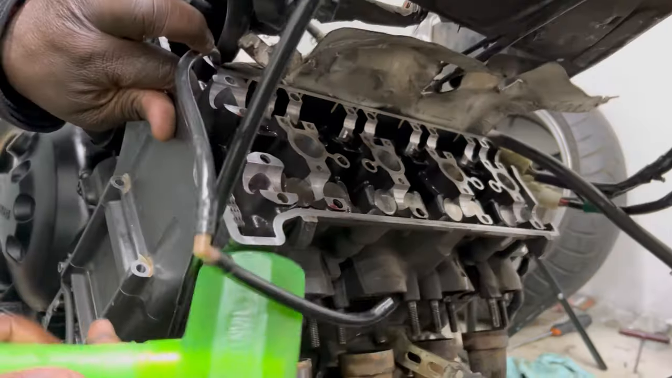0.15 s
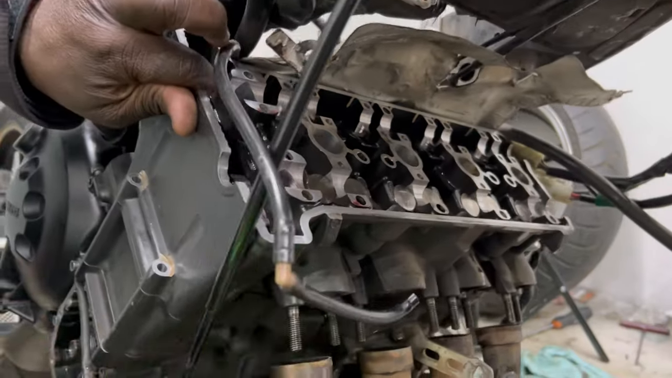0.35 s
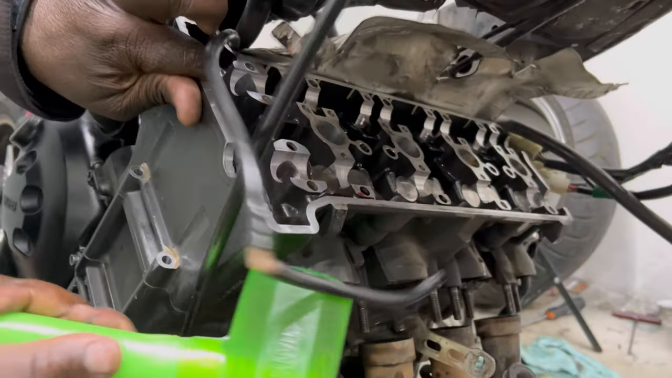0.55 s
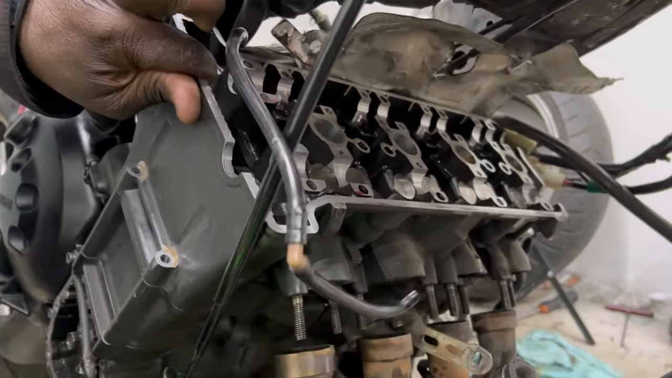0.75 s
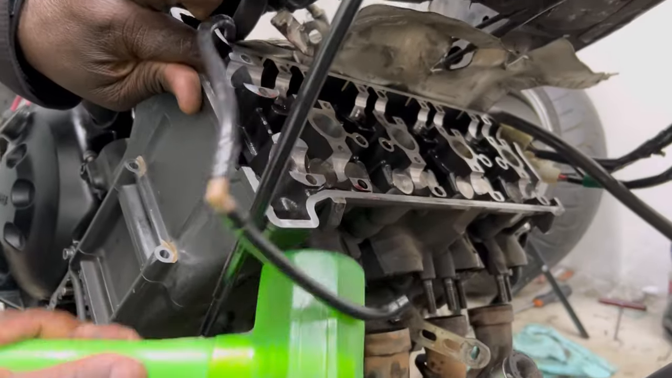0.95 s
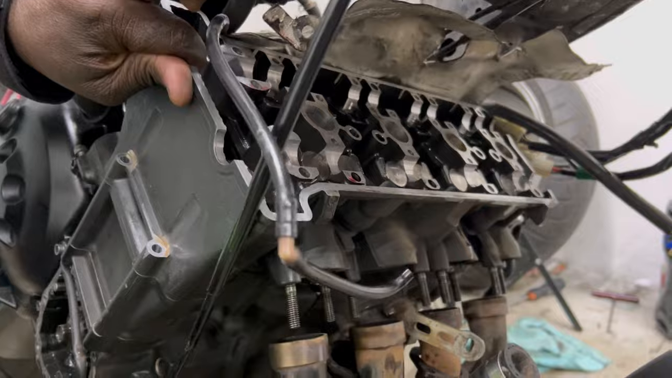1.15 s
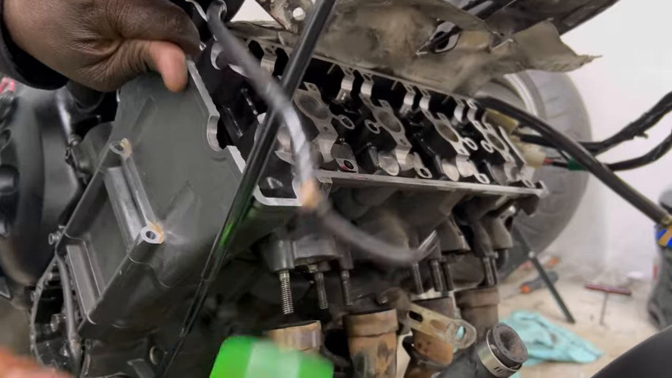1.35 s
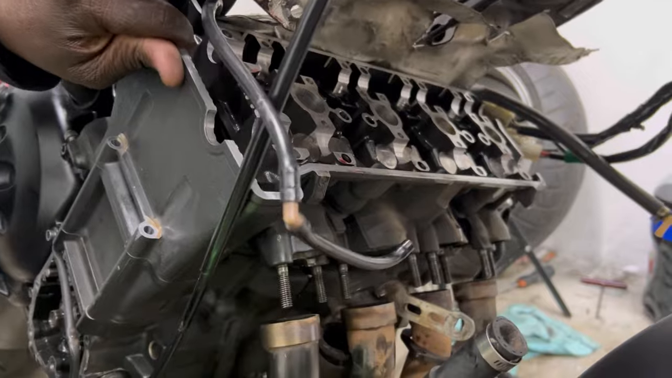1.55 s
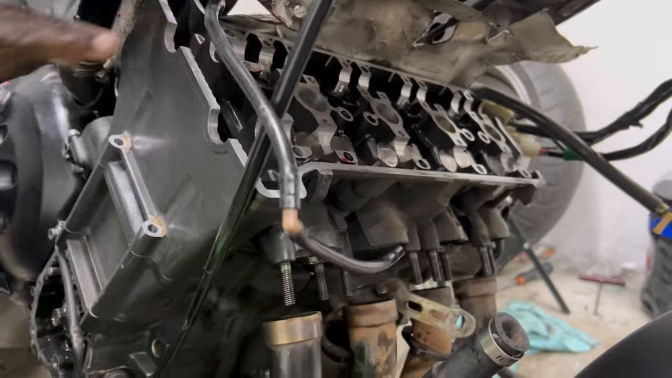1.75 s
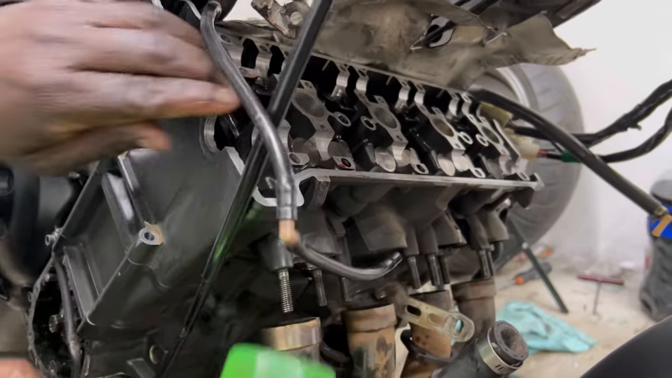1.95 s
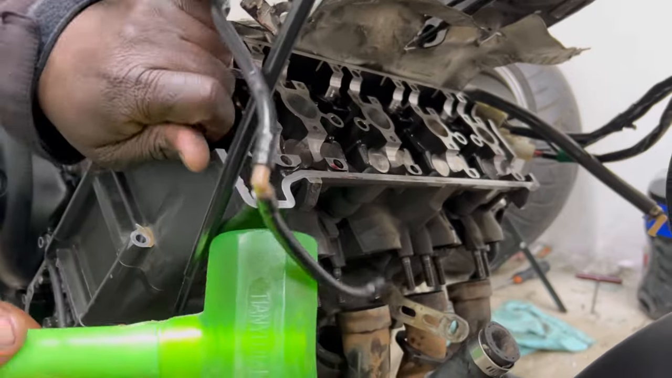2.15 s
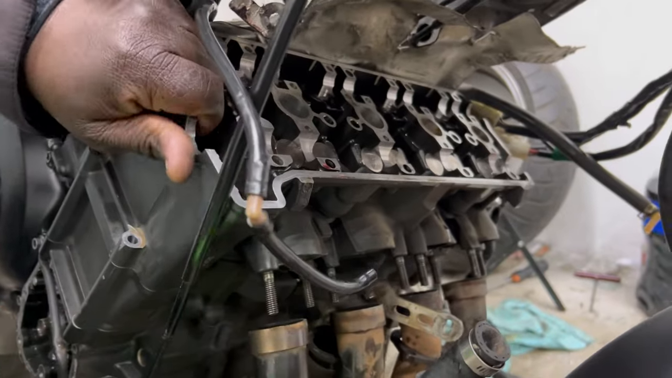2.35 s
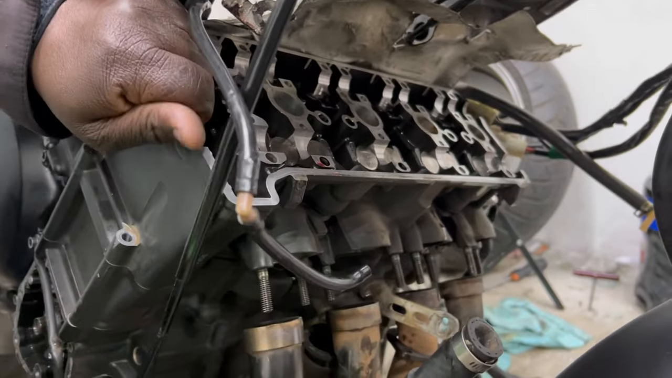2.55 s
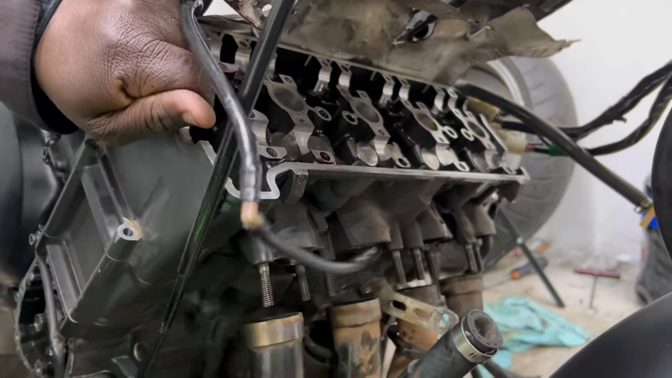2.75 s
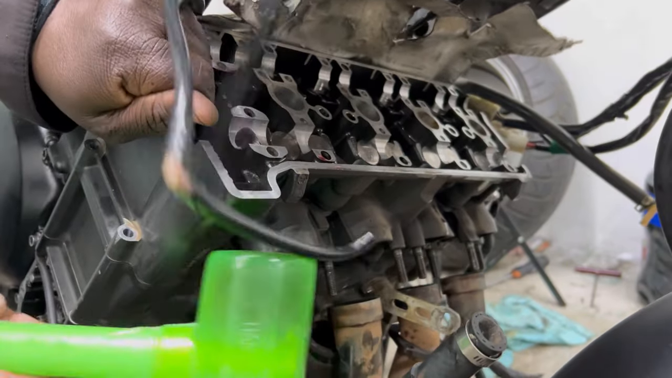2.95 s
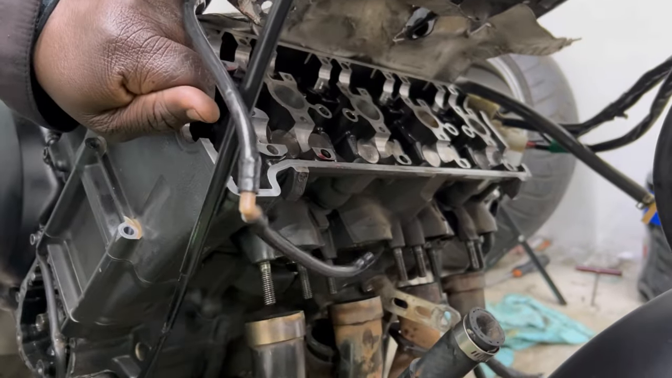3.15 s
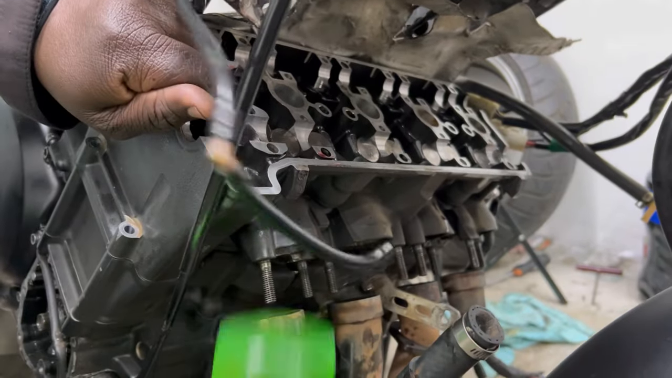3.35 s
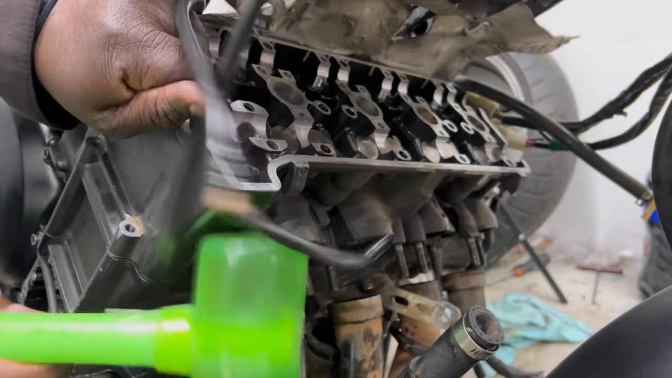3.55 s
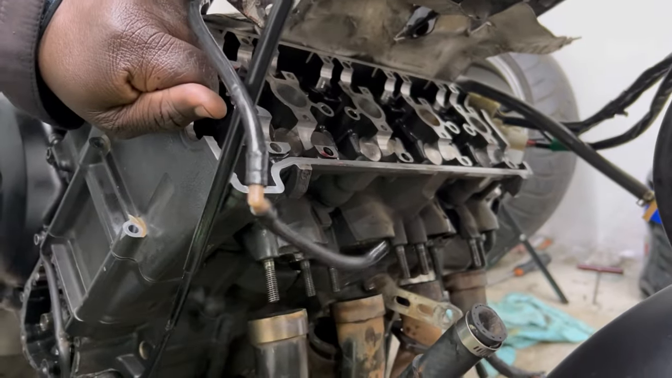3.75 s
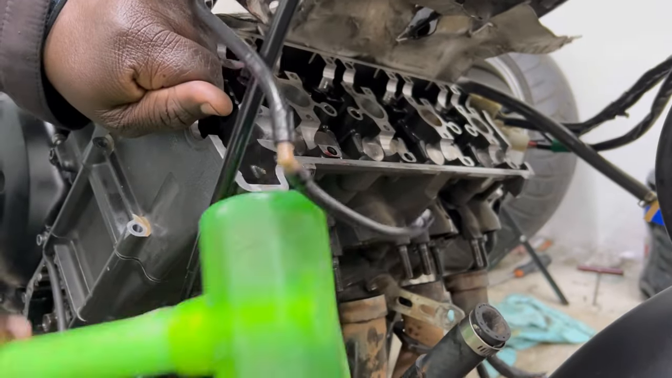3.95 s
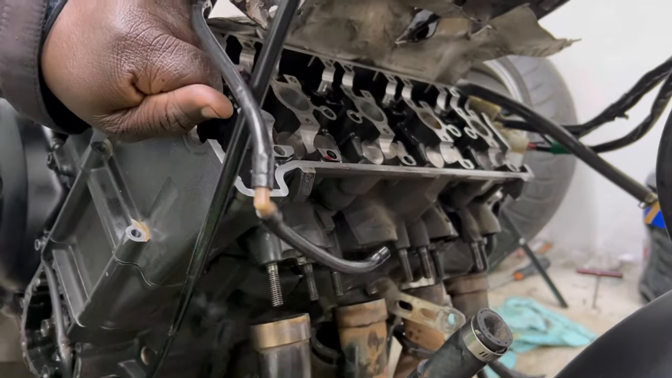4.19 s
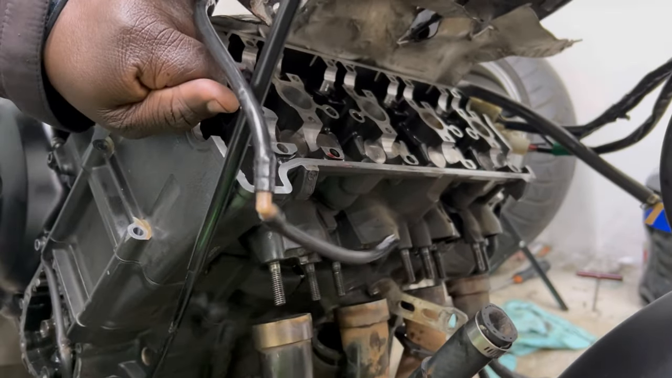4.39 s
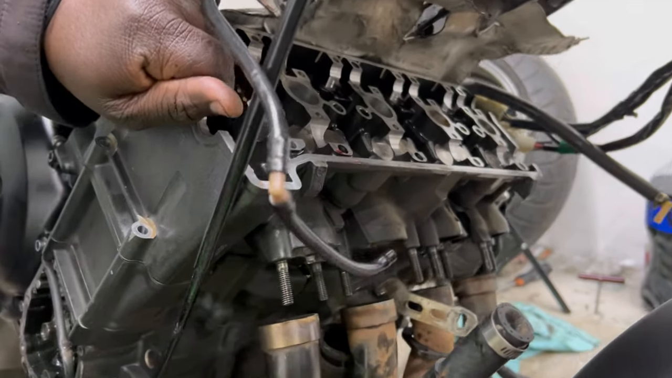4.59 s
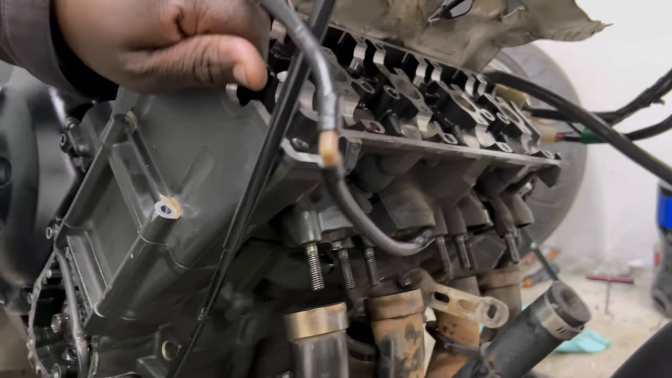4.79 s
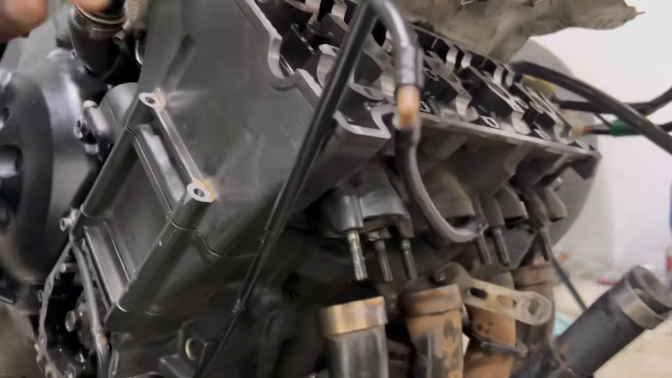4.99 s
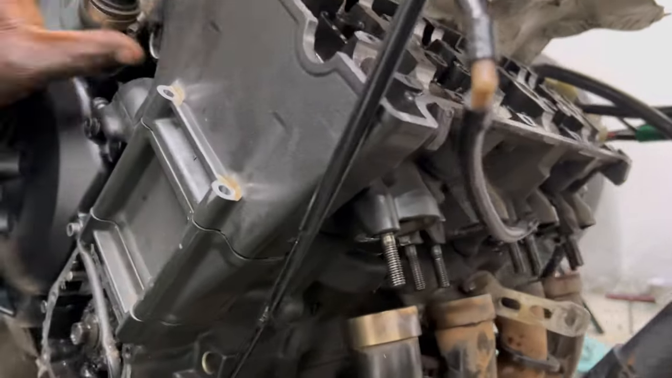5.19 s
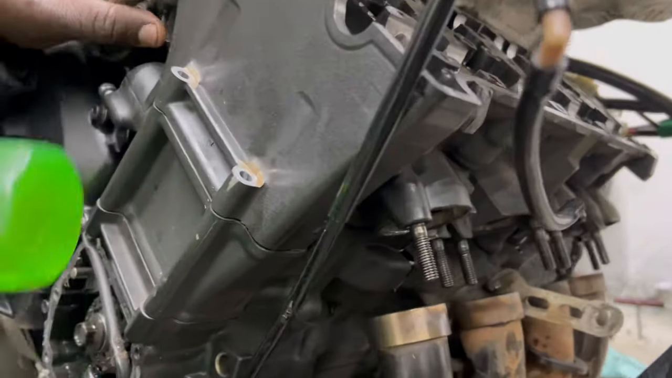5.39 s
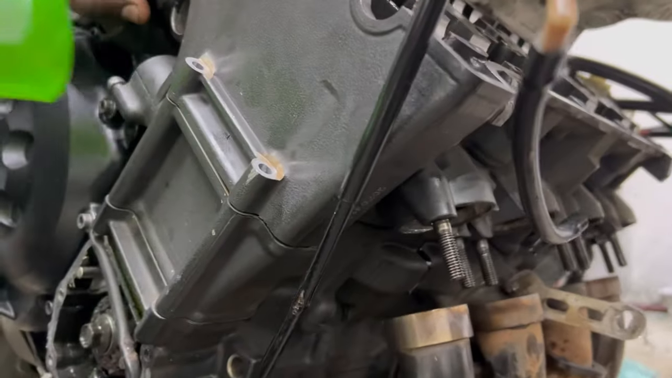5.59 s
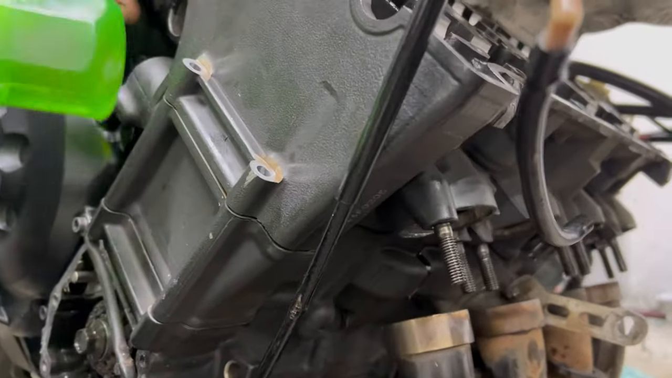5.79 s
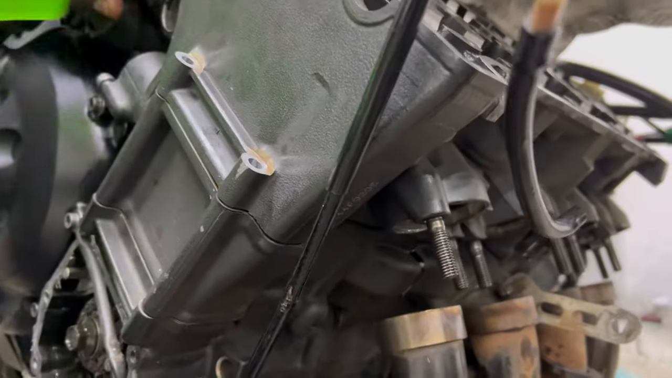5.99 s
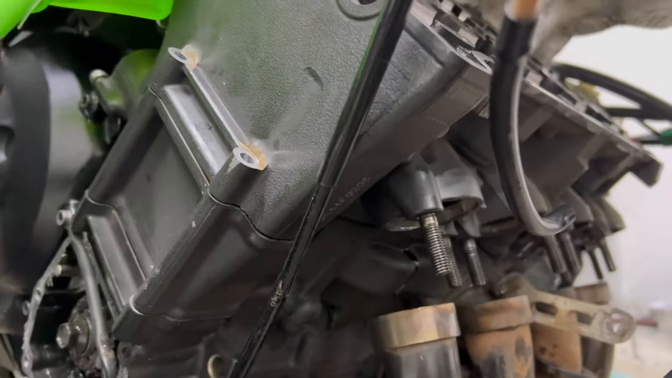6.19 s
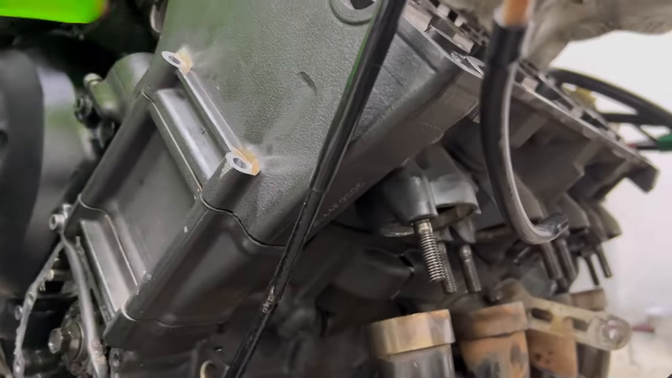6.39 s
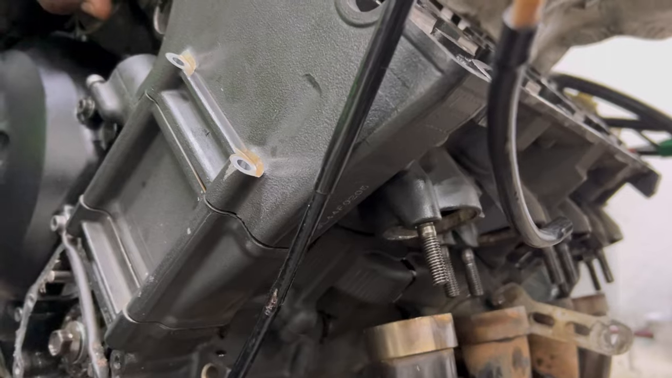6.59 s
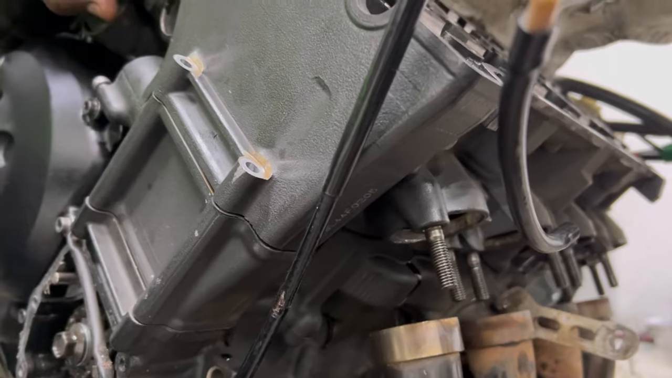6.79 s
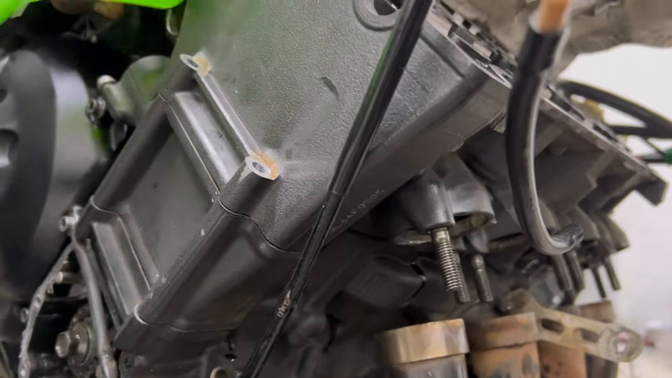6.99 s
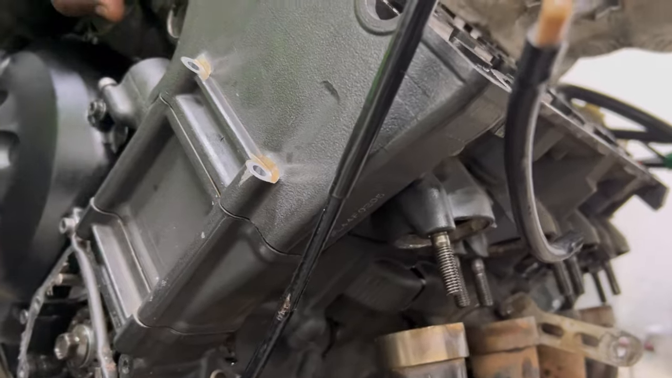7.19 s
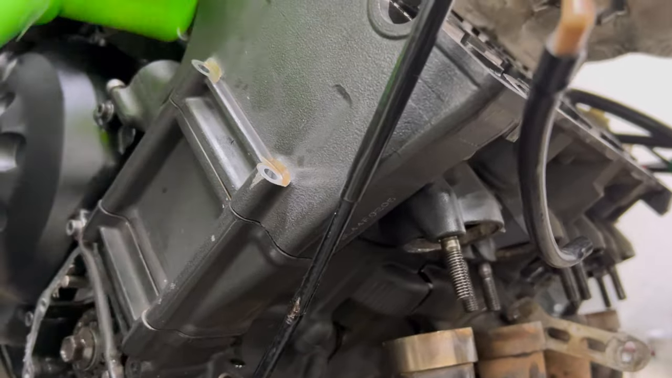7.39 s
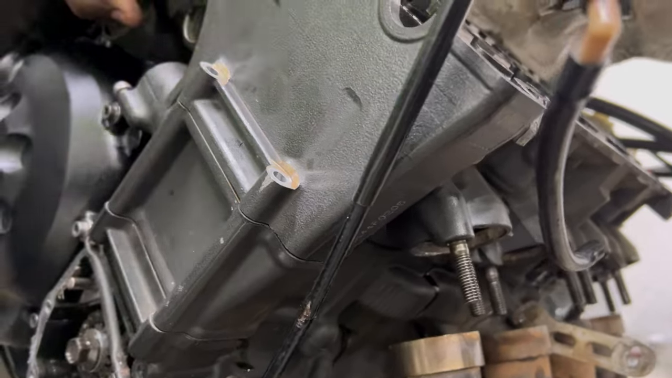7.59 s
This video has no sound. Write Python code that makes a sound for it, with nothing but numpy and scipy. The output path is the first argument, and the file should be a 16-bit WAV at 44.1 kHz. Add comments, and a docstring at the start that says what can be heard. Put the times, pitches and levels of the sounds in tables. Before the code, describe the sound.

Close up in a bare, hard-walled workshop, a plastic mallet strikes an aluminium engine head. Four loud cracking blows come first, then a pause with soft handling knocks and ticks, then six regular blows three a second. After a longer pause with faint hand rub, a duller side blow, a ringing one, and a quick cluster as the head rocks loose with a low boom and clatter.

```python
"""A bare workshop: a plastic mallet knocks a motorcycle's aluminium cylinder head loose, close to a phone.
Hard blows on a corner and the underside, two on the side, then a cluster as the head rocks free.
Each blow excites damped casting modes and a noise-burst crack; echo patterns, two drawn per sound from
a small set, carry them into the room. Filtered noise makes the room tone, hand rub, ticks and scrapes;
soft pushes ring a loose fitting; sines hum."""
import sys
import numpy as np
from scipy import signal
from scipy.fft import rfft, irfft
from scipy.io import wavfile

SR = 44100
rng = np.random.default_rng(int(sys.argv[2]) if len(sys.argv) > 2 else 0)


def output_pcm(signal):
    """Save a mono or channel-first signal as 16-bit PCM at the path in sys.argv[1].

    Samples are clipped to [-1, 1] before scaling.
    """
    pcm = np.clip(np.atleast_2d(signal).T, -1, 1) * 32767
    wavfile.write(sys.argv[1], SR, np.round(pcm).astype(np.int16))


N = 336737

# room tone spectrum: freq_hz, level_db
ROOM_TONE = [(20, -24), (30, -29.5), (65, -29), (110, -37), (200, -45.5), (320, -60), (600, -65),
             (1200, -67), (2300, -72), (7000, -76.5), (16000, -81.5)]
# low hum that comes and goes: start_s, end_s, pitch_hz, rms_db at full swell
HUMS = [(-.05, .085, 64.7, -42), (2.3, 2.75, 91.3, -50)]
# hand sliding over the casting: start_s, length_s before release, level_db
SLIDES = [(.005, 0.014, -41.5), (0.264, 1, -68), (1.259, 0.51, -59), (1.785, 0.15, -67.5),
          (2.12, 0.26, -64.5), (2.384, 0.33, -61), (4.496, 0.31, -66), (4.791, 0.1, -59),
          (4.916, 0.506, -64.5), (5.421, 0.257, -63), (6.976, 0.58, -66)]
SLIDE_ATTACK_S, SLIDE_RELEASE_T60_S = 0.049, 0.23
# workshop reverberation bands: freq_hz, level_db, t60_s
REVERB_BANDS = [(25.2, -7, 0.81), (61.6, 12.5, 0.83), (124, 6.5, 0.56), (265, 0, 0.72), (515, 4, 0.54),
                (1210, 4.5, 0.58), (1420, 0.5, 0.57), (2500, -1.5, 0.58), (5430, -6.5, 0.47),
                (8010, -4.5, 0.35), (12100, -7.5, 0.43), (16000, -18.5, 0.28)]
# standing waves between the walls: pitch_hz, resonance_db, t60_s
STANDING_WAVES = [(90, 11.5, 0.85), (125.4, 11, 1.5), (148.9, 21, .8), (238.8, 14.5, 0.3),
                  (273.4, 2.5, 0.22), (317, -2, 0.3), (444, -2, 0.66), (485, 8.5, 0.13), (722, 6, 0.34),
                  (854, 0.5, 0.45)]
# short scrapes of hand and parts over metal: start_s, length_s, level_db before the swell,
# centre_hz, width_hz of each of two resonator passes
SCRAPES = [(0.058, 0.016, -40.5, 11600, 6300), (4.824, 0.045, -62, 808, 1200),
           (4.828, 0.06, -66, 3000, 1200), (5.17, .05, -73, 798, 254), (5.34, 0.2, -70.5, 2100, 197.6),
           (5.487, .05, -67.5, 5360, 900), (5.557, 0.08, -58.5, 950, 1406), (7.13, 0.048, -47, 5640, 1100),
           (7.138, 0.023, -43, 4530, 700)]
# loose parts ticking: start_s, level_db, centre_hz, t60_s
TICKS = [(.099, 1, 8720, 0.014), (.128, -8, 8000, 0.012), (.292, -29, 10840, 0.01),
         (2.005, -24, 4200, 0.03), (2.022, -7, 4960, 0.03), (2.051, -7, 5170, 0.038),
         (2.079, -23.5, 9000, 0.017), (2.115, -25, 9000, .012), (4.939, -24, 4000, .014),
         (5.598, -24, 2500, 0.035), (7.405, -5, 4680, 0.014), (1.748, -15, 2600, 0.012)]
# mallet blows and the loosened head's rebounds on its studs:
# start_s, force_db, hardness_db_per_octave, clank_db, room_db, spot
BLOWS = [(.106, 0, -1.05, 3, -7.5, "corner"), (0.549, 3, 0.16, 2, -3, "corner"),
         (0.887, 3.5, 0.34, 2, -3.5, "corner"), (1.2183, 1.5, 0.5, 1, -1, "corner"),
         (2.039, -14, -4, 4, -4.5, "corner"), (2.043, -15, 3, -2, 1, "studs"),
         (2.5989, 1, 0, 0.5, -1, "underside"), (2.9395, 0.5, 0.5, 0.5, 0, "underside"),
         (3.2509, 1, -0.15, 0.5, 0.5, "underside"), (3.5602, 0, 0.4, 1, 0.6, "underside"),
         (3.885, -0.3, 0.2, 0, 1, "underside"), (4.233, 0.5, 0.8, 1, -0.16, "underside"),
         (6.09, -8, -2.5, 1.5, -11, "side"), (6.9817, -1, 0.96, 0.5, -1.5, "side"),
         (7.362, -17, -5.5, -0.5, 3.5, "underside"), (7.3785, -2.5, 0.5, -1.5, -8.5, "corner"),
         (7.404, 3.5, -1.5, 0.5, -9, "studs"), (7.4371, 0.5, -3.5, 3, -7, "studs")]
# modes of the head on its block: nominal pitch_hz, t60_s, then resonance_db struck at
# corner, underside, side, studs
HEAD_MODES = [(200, 0.048, 15, 18.5, 7, 6.5), (284, 0.025, 31, 32.5, 10.5, 5.5),
              (431, 0.02, 26, 27.5, 16, 6), (487.5, 0.2, 18, 27.5, 18, 2.5), (564, 0.13, 20, 25.5, 13, 3),
              (729, 0.024, 27, 20.5, 15, 2), (800, 0.022, 13.5, 29, 10.5, 3), (1080, 0.6, 24, 17.5, 30, 23),
              (1080, 0.22, 23, 19.5, 36.5, 21.5), (1085, 0.12, 11.5, 6.5, 16, 29.5),
              (1200, 0.02, 20.5, 13, -7, 0), (1560, 0.025, 20.5, 29, 1, 4),
              (1603, 0.04, 32, 17.5, 26.5, 9.5), (1584, 0.4, 29.5, 22.5, 30.5, 13),
              (2120, 0.0057, 16, 8, 23.5, -10), (2163, 0.3, 10, 4.5, 25.5, 12),
              (2202, 0.088, 16.5, 8, 28, 22.5), (2710, 0.05, 13, 2, 10, 0), (3720, 0.24, 10, -1, 21.5, 3.5),
              (4330, 0.025, 12.5, 13.5, 3, -9), (5690, 0.02, 13.5, 15.5, 9, -8)]
# per spot: crack_db, crack_t60_s, graze_db re crack, rattle_db re crack, top_treble_db, left_minus_right_db
SPOTS = {"corner": (-0.5, 0.0568, -9, -4.5, -5, -0.5), "underside": (0, 0.0048, -8, -2.5, -1.5, -2.1),
         "side": (-4, 0.03, -28.5, -15, -13.5, -2), "studs": (-23, 0.3, -20, -2.5, -9.5, -2.5)}
# the casting's crowd of quickly damped modes: freq_hz, level_db
CRACK_SPECTRUM = [(25, -13), (60, 8), (110, 17), (250, 21.5), (900, 17.5), (2000, 17.5), (3500, 11.5),
                  (5800, 14.5), (7500, 9.5), (10500, 6.5), (13500, 16), (16500, -6)]
# share of the crack straight to the phone: freq_hz, level_db
CRACK_TOWARD_PHONE = [(200, -5.5), (700, -5.5), (1500, -1), (3000, 0.5), (7000, 1.5), (9500, 3),
                      (13000, 1.5), (16000, -3)]
# share of the crack sent out into the room: freq_hz, level_db
CRACK_OUTWARD = [(100, 7.5), (300, 1), (700, 2.5), (1200, 4), (2200, 0.5), (3200, 4), (4500, 2.5),
                 (7000, 5), (12000, -4)]
# loose valve parts clattering after a blow: freq_hz, level_db
CLATTER_SPECTRUM = [(700, -12.5), (2200, 3.5), (6000, -1), (12000, -13.5)]
# hand nudging a loose fitting: start_s, level_db, hardness_db_per_octave
NUDGES = [(1.949, 17.5, -5), (2.004, 14.5, -11), (2.024, 15.5, -5.5), (4.784, -4.5, -8), (5.729, 3.5, -12)]
# modes of the fitting: pitch_hz, t60_s, resonance_db
FITTING_MODES = [(860, 0.025, -6), (1152, 0.048, -1.5), (2180, 0.018, 0.5), (3756, .03, -5)]
# head coming loose and rocking: start_s, pitch_hz, t60_s, resonance_db
ROCKS = [(7.367, 201.8, 0.16, 39), (7.401, 210.6, 0.12, 37.5)]

# plastic face: hardness tilts its push about the pivot
PIVOT_HZ, THUD_HZ, CRACK_HZ = 990, 280, 3600
FACE_SOFT_HZ, FACE_SOFT_DB = 2680, -1.5
# the face grazes the metal, then seats; each mode lags part of a cycle and swells
SEAT_S, LAG_CYCLES, SWELL_CYCLES = 0.0011, 0.3, 0.35
# pitch scatter (share) from blow to blow, full for modes no longer than the t60
DETUNE, DETUNE_T60_S = 0.015, 0.03
TOP_HZ = 16900
RING_SIZE = 3 * 2 ** 14
AGE_S = np.arange(RING_SIZE) / SR
TIME_S = np.arange(N) / SR


def undb(db):
    """Decibels to gain."""
    return 10 ** (np.asarray(db) / 20)


def along(hz, points_hz, values):
    """Read a curve on a log-frequency axis."""
    return np.interp(np.log(np.maximum(hz, 1)), np.log(points_hz), values)


def colour(x, points):
    """Zero-phase filter by a (freq_hz, level_db) spectrum."""
    size = x.shape[-1]
    hz = np.arange(size // 2 + 1) * SR / size
    gain = undb(along(hz, *np.transpose(points)))
    return irfft(rfft(x) * gain, size)


def causal(x, points):
    """Minimum-phase filter by a (freq_hz, level_db) spectrum: nothing sounds before the attack."""
    hz = np.arange(RING_SIZE // 2 + 1) * SR / RING_SIZE
    cepstrum = irfft(np.log(undb(along(hz, *np.transpose(points)))))
    cepstrum[1:RING_SIZE // 2] *= 2
    cepstrum[RING_SIZE // 2 + 1:] = 0
    return irfft(rfft(x) * np.exp(rfft(cepstrum)))


def fade(t60_s):
    """Exponential decay of unit energy."""
    shape = np.exp(-np.log(1000) * AGE_S / t60_s)
    return shape / np.linalg.norm(shape)


def mode(hz, t60_s, delay_s=0, swell_s=0):
    """Damped sine, scaled to gain 1 at resonance before any swell; may start late."""
    age_s = np.maximum(AGE_S - delay_s, 0)
    damping = np.log(1000) / t60_s
    swell = 1 - np.exp(-age_s / swell_s) if swell_s > 0 else 1
    return 2 * damping / SR * swell * np.exp(-damping * age_s) * np.sin(2 * np.pi * hz * age_s)


def diffuse(size, apart_hz=950, likeness=0.88):
    """Noise from all sides at two ports: alike in the bass, unrelated in the treble."""
    hz = np.arange(size // 2 + 1) * SR / size
    alike = likeness * np.exp(-(hz / apart_hz) ** 2)
    mid, side = rfft(rng.standard_normal((2, size)))
    mid = mid * np.sqrt((1 + alike) / 2)
    side = side * np.sqrt((1 - alike) / 2)
    return irfft(np.array([mid + side, mid - side]), size)


def wander(size, per_s):
    """Random values joined by straight lines; spread near 1."""
    steps = np.arange(size) * per_s / SR
    return 1.2 * np.interp(steps, np.arange(size), rng.standard_normal(size))


def add(track, start_s, sound):
    """Mix a sound in at start_s."""
    start = int(start_s * SR)
    track[:, start:start + sound.shape[1]] += sound[:, :N - start]


def sliding():
    """Strength of the hand's rub: each slide swells, holds and dies away."""
    strength = 0
    for start_s, length_s, db in SLIDES:
        attack = np.clip((TIME_S - start_s) / SLIDE_ATTACK_S, 0, 1)
        released_s = np.maximum(TIME_S - start_s - length_s, 0)
        release = np.exp(-np.log(1000) * released_s / SLIDE_RELEASE_T60_S)
        strength = strength + undb(db) * attack * release
    return strength


def rubbing(grip_db=2.5, grain_db=0.5):
    """A hand's rustle: noise whose level drifts with grip and is roughened by tiny slips."""
    rub = colour(diffuse(N), [(150, -12.0), (600, 3.5), (2000, 5), (3500, -3.5),
                              (6000, -2.0), (9000, -6.5), (16000, -10.0)])
    rub = rub * undb(grip_db * wander(N, 30) + grain_db * wander(N, 360))
    return sliding() * rub / rub.std()


def background():
    """Diffuse room tone, hand rub and passing sine hums."""
    tone = colour(diffuse(N), ROOM_TONE)
    hum = 0
    for start_s, end_s, hz, db in HUMS:
        edge_s = np.minimum(TIME_S - start_s, end_s - TIME_S)
        swell = np.clip(edge_s / (end_s - start_s) * 4, 0, 1)
        hum = hum + undb(db) * swell * np.sqrt(2) * np.sin(2 * np.pi * hz * TIME_S)
    return tone + rubbing() + hum


def reverberation(first_s=0.0046, build_s=0.004):
    """Scattered echoes: a short gap, a build-up of a few ms, then decay at a rate set per band."""
    points_hz, db, t60_s = np.transpose(REVERB_BANDS)
    hz = np.arange(RING_SIZE // 2 + 1) * SR / RING_SIZE
    noise = rfft(diffuse(RING_SIZE)) * undb(along(hz, points_hz, db))
    tail = 0
    # each row of the identity crossfades one band in
    for share, band_t60_s in zip(np.eye(len(REVERB_BANDS)), t60_s):
        tail = tail + irfft(noise * along(hz, points_hz, share)) * fade(band_t60_s)
    return tail * (1 - np.exp(-(np.maximum(AGE_S - first_s, 0) / build_s) ** 2))


def workshop(count=6):
    """Echo patterns for sound sent in different directions, and the room's standing waves."""
    standing = sum(undb(db) * mode(hz, t60_s, delay_s=0.0047) for hz, db, t60_s in STANDING_WAVES)
    return [reverberation() for _ in range(count)], standing


def heard(direct, radiated, room, room_db, pan_db=0, lag_samples=4):
    """Direct sound, right port first, plus two radiated parts, each with its own echoes."""
    patterns, standing = room
    first, second = rng.permutation(len(patterns))[:2]
    responses = (patterns[first] + standing, patterns[second])
    echoes = 0
    for source, response in zip(radiated, responses):
        echoes = echoes + signal.fftconvolve(source[None], response, axes=1)[:, :RING_SIZE]
    left = np.pad(direct[0], (lag_samples, 0))[:RING_SIZE]
    near = np.array([left, direct[1]]) * undb([[pan_db / 2], [-pan_db / 2]])
    return near + undb(room_db) * echoes


def scrape(length_s, db, hz, width_hz, grain_db=5.5):
    """Uneven slips swell and fade in one resonance of the metal."""
    slips = rng.standard_normal((2, RING_SIZE)) * undb(grain_db * wander(RING_SIZE, 300))
    resonance = signal.iirpeak(hz, hz / width_hz, fs=SR)
    rubbed = signal.lfilter(*resonance, signal.lfilter(*resonance, slips))
    return undb(db) * rubbed / rubbed.std() * np.sin(np.pi * np.minimum(AGE_S / length_s, 1))


def crack(t60_s, rattle_db, rattle_t60_s, spread_rad=.6):
    """Dense modes as a noise burst with a second decay for the buzz of loose metal; unit energy."""
    common, left, right = rng.standard_normal((3, RING_SIZE))
    noise = np.cos(spread_rad) * common + np.sin(spread_rad) * np.array([left, right])
    envelope = np.hypot(fade(t60_s), undb(rattle_db) * fade(rattle_t60_s))
    return noise * envelope / np.hypot(1, undb(rattle_db))


def tick(db, hz, t60_s):
    """Light metal contact with no weight behind it: a short noise burst peaked at hz."""
    shape = [(hz / 6, db - 20), (hz / 1.8, db - 4), (hz, db), (hz * 1.8, db - 4), (hz * 5, db - 14)]
    near = causal(crack(t60_s, rattle_db=-16.0, rattle_t60_s=.08), shape)
    return near, near * np.sqrt(1 / 2)


def contact_colour(force_db, hardness_db, clank_db):
    """Push spectrum of one blow: force lifts it, a hard contact tilts it up, its aim adds clank."""
    shape = [(THUD_HZ, 0), (850, 0), (1080, clank_db), (1700, clank_db),
             (FACE_SOFT_HZ, FACE_SOFT_DB), (CRACK_HZ, FACE_SOFT_DB)]
    return [(hz, force_db + db + hardness_db * np.log2(hz / PIVOT_HZ)) for hz, db in shape]


def casting(spot, lasting_db=-5, outward_db=-2):
    """The head's modes as one spot excites them: heard near, and radiated into the room."""
    ring, radiated = 0, 0
    column = list(SPOTS).index(spot)
    # shifting grip detunes the most damped modes
    shifts = rng.standard_normal(len(HEAD_MODES))
    for (hz, t60_s, *spot_db), shift in zip(HEAD_MODES, shifts):
        hz = hz * (1 + DETUNE * shift * min(1, DETUNE_T60_S / t60_s))
        tone = undb(spot_db[column]) * mode(hz, t60_s, SEAT_S + LAG_CYCLES / hz, SWELL_CYCLES / hz)
        ring = ring + tone
        # modes that ring long lose little to the air
        radiated = radiated + tone * undb(outward_db + lasting_db * t60_s / .5)
    return ring, radiated


def blow(contact, spot, rattle_t60_s=0.045, clatter_t60_s=0.076, near_rattle_db=-10):
    """One blow, near and radiated: a graze, then crack, casting ring and rattle, all shaped by the push."""
    crack_db, crack_t60_s, graze_db, rattle_db, top_db, _ = SPOTS[spot]
    ring, radiated = casting(spot)
    burst = crack(crack_t60_s, rattle_db + near_rattle_db, rattle_t60_s)
    seat = int(SEAT_S * SR)
    graze = undb(graze_db) * burst[:, seat:2 * seat]
    burst = np.hstack([graze, burst[:, :RING_SIZE - seat]])
    # valve parts clatter differently on every blow
    rattle = rng.standard_normal(RING_SIZE) * fade(clatter_t60_s)
    clatter = undb(rattle_db) * causal(rattle, CLATTER_SPECTRUM)
    # the room gathers the crack from all sides, evening out its spectrum: an impulse, not noise
    push = causal(AGE_S == 0, CRACK_OUTWARD) + clatter
    near_and_room = np.vstack([causal(burst, CRACK_TOWARD_PHONE), push])
    snap = undb(crack_db) * causal(near_and_room, CRACK_SPECTRUM)
    snap = causal(snap, [(4000, 0.00092), (13000, top_db)])
    return causal(ring + snap[:2], contact), causal(np.array([radiated, snap[2]]), contact)


def nudge(db, hardness_db, push_s=0.0062, skin_db=-43, skin_t60_s=0.037):
    """A soft push of a few ms swells the fitting's modes under a brief brush of skin."""
    ring = sum(undb(mode_db) * mode(hz, t60_s) for hz, t60_s, mode_db in FITTING_MODES)
    brush = causal(rng.standard_normal((2, RING_SIZE)),
                   [(300, -16.0), (900, 9.5), (2400, 2), (5000, -7.0), (12000, -8)])
    skin = undb(skin_db) * brush * np.exp(-np.log(1000) * AGE_S / skin_t60_s)
    sound = (ring + skin) * (1 - np.exp(-(AGE_S / push_s) ** 2))
    tilt_db = hardness_db * np.log2(CRACK_HZ / PIVOT_HZ)
    return causal(sound, [(PIVOT_HZ, db), (CRACK_HZ, db + tilt_db)])


def rocking(hz, t60_s, db, swell_s=0.0035):
    """The head breaks free of its gasket and booms on its studs: one swelling damped mode."""
    boom = undb(db) * mode(hz, t60_s, swell_s=swell_s)
    return np.array([boom, boom])


def scene():
    """Scrapes, ticks, blows, nudges and rocking in the workshop, over its background."""
    room, out = workshop(), background()
    for start_s, length_s, db, hz, width_hz in SCRAPES:
        rasp = scrape(length_s, db, hz, width_hz)
        add(out, start_s, heard(rasp, rasp, room, room_db=-7.0))
    for start_s, db, hz, t60_s in TICKS:
        add(out, start_s, heard(*tick(db, hz, t60_s), room, room_db=-4.8))
    for start_s, force_db, hardness_db, clank_db, room_db, spot in BLOWS:
        contact = contact_colour(force_db, hardness_db, clank_db)
        add(out, start_s, heard(*blow(contact, spot), room, room_db, pan_db=SPOTS[spot][-1]))
    for start_s, db, hardness_db in NUDGES:
        knock = nudge(db, hardness_db)
        add(out, start_s, heard(knock, knock, room, room_db=-7))
    for start_s, hz, t60_s, db in ROCKS:
        boom = rocking(hz, t60_s, db)
        add(out, start_s, heard(boom, boom, room, room_db=-16))
    return out


def record(dry):
    """The phone's two ports differ in colour; it thins deep bass, rounds high peaks and cuts the top."""
    left = colour(dry[0], [(150, -2.5), (400, 5.5), (1200, -3.0), (2400, 2.5),
                           (4600, -1.5), (8000, -3.0), (12000, -2.5)])
    right = colour(dry[1], [(150, -2.5), (400, 6.5), (1200, -1.3), (2400, -0.2),
                            (4600, 4.5), (8000, -0.5), (12000, -4.5)])
    bass_cut = signal.butter(2, 40, "high", fs=SR, output="sos")
    ports = signal.sosfilt(bass_cut, [left, right])
    rounded = ports / (1 + (ports / .92) ** 4) ** (1 / 4)
    top_cut = signal.ellip(8, .2, 70, TOP_HZ, fs=SR, output="sos")
    return signal.sosfilt(top_cut, rounded)


dry = scene()
out = record(dry)
output_pcm(out)
```